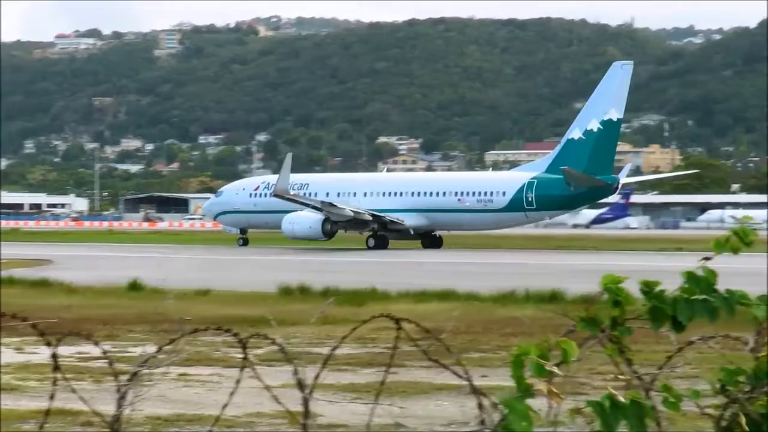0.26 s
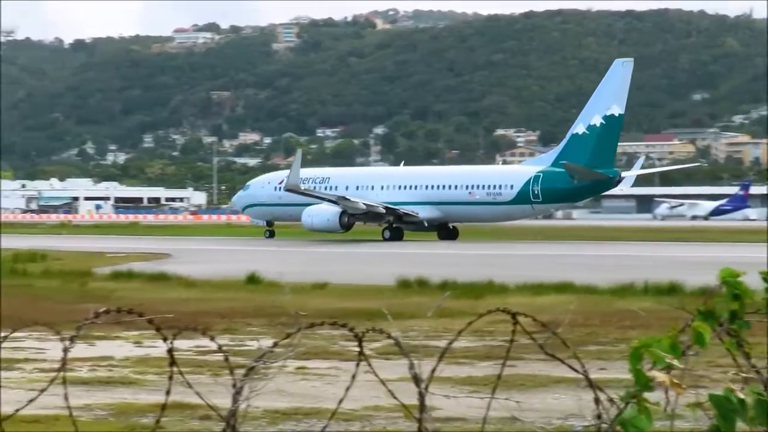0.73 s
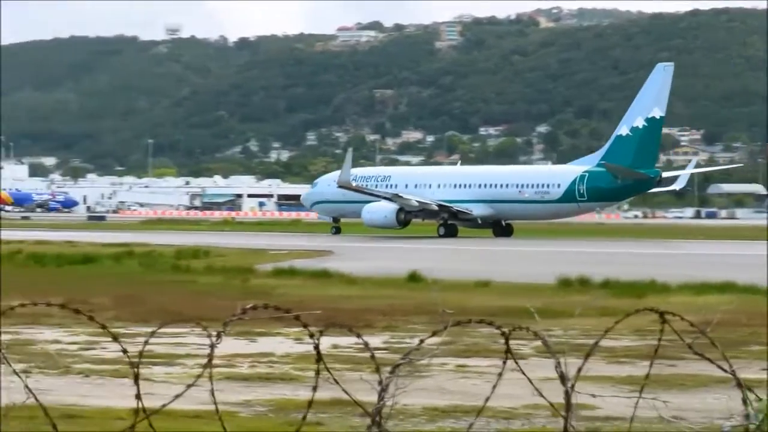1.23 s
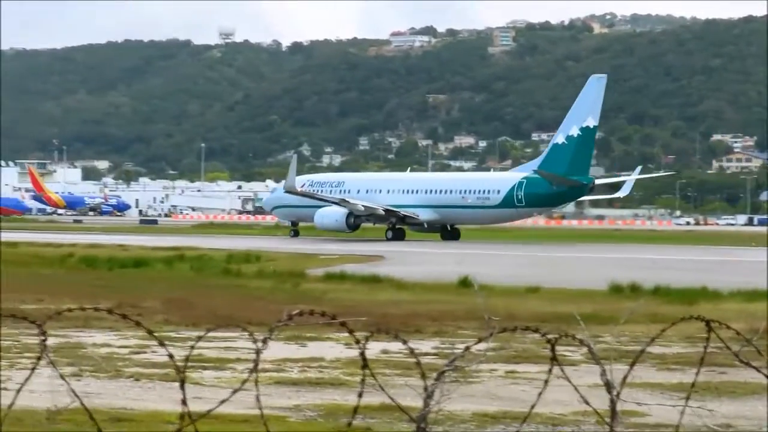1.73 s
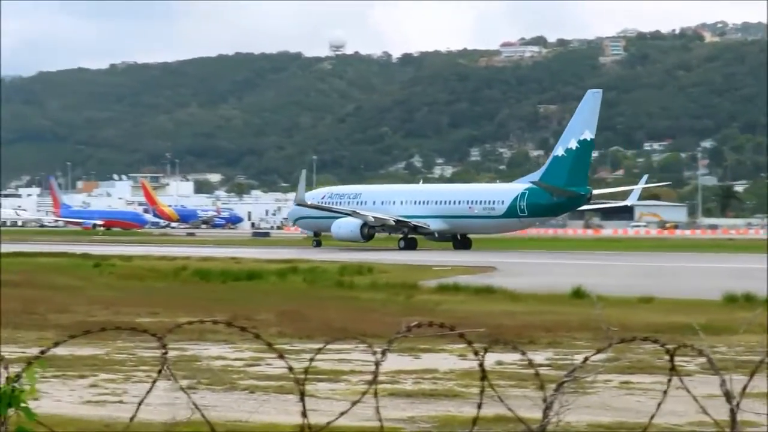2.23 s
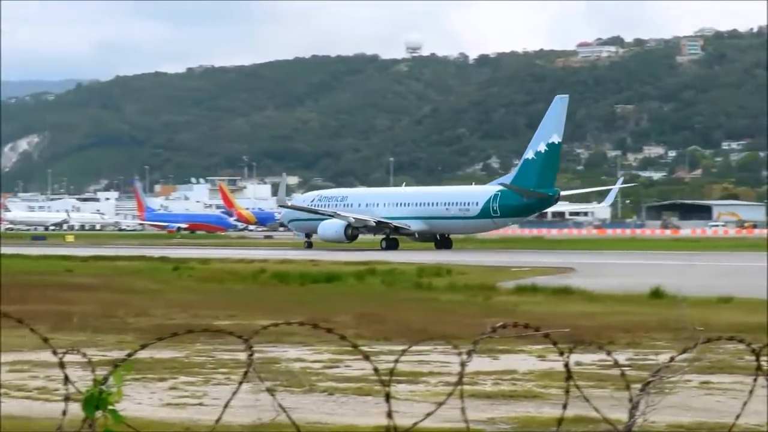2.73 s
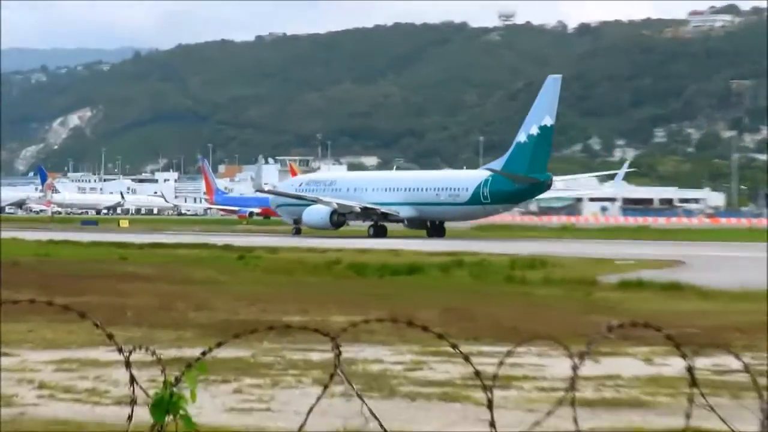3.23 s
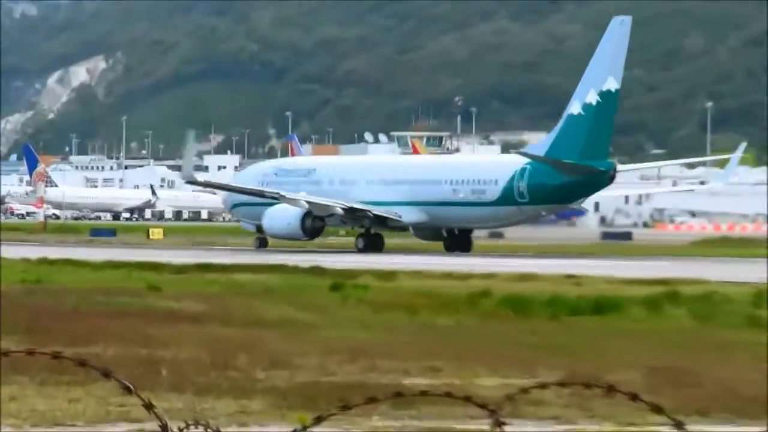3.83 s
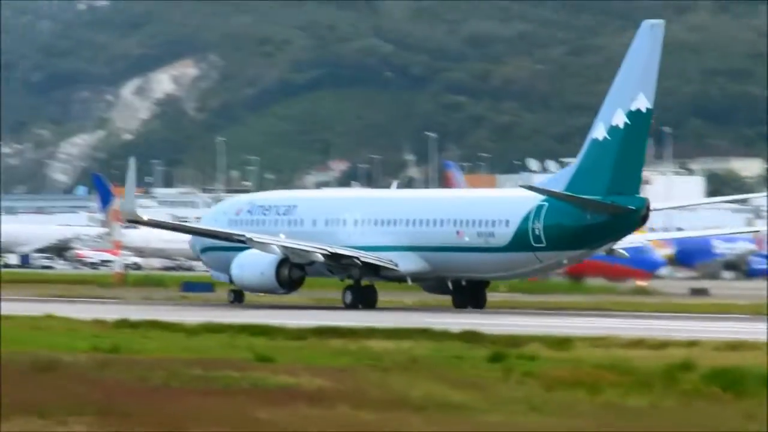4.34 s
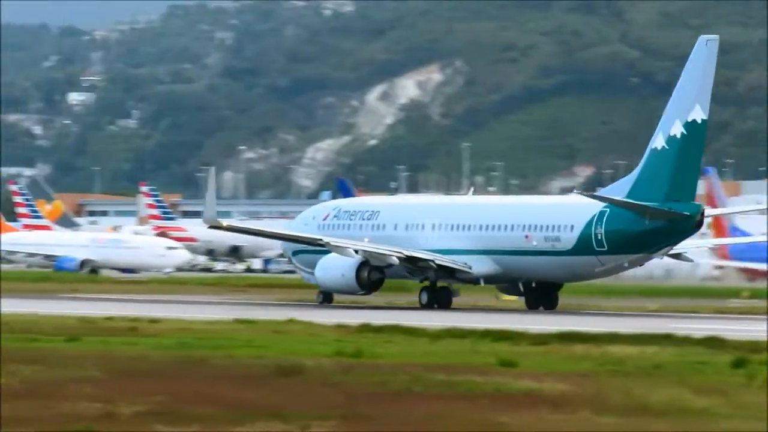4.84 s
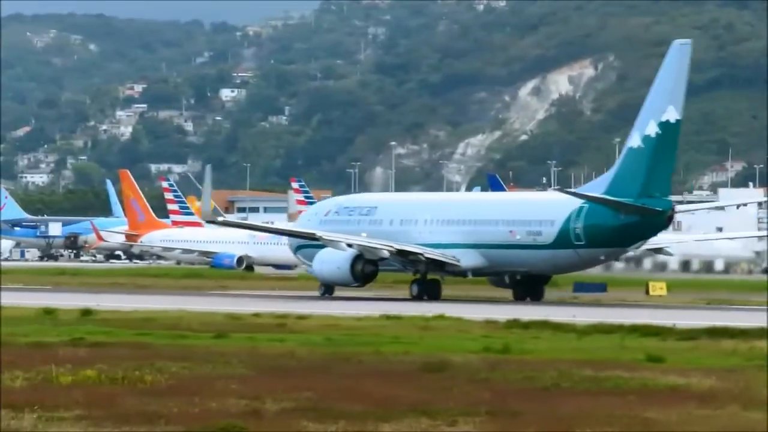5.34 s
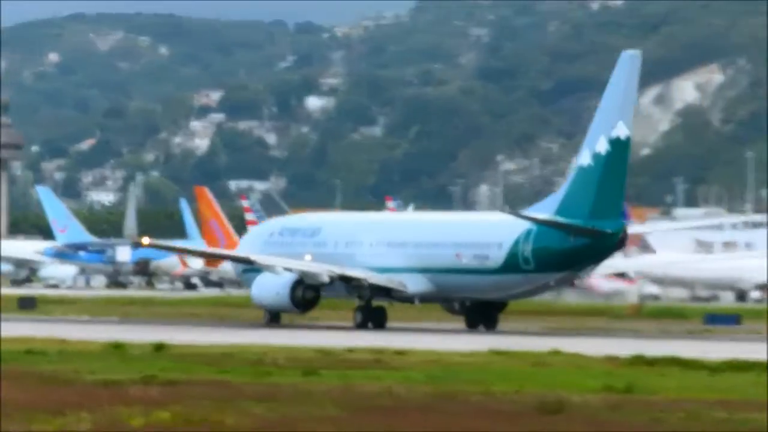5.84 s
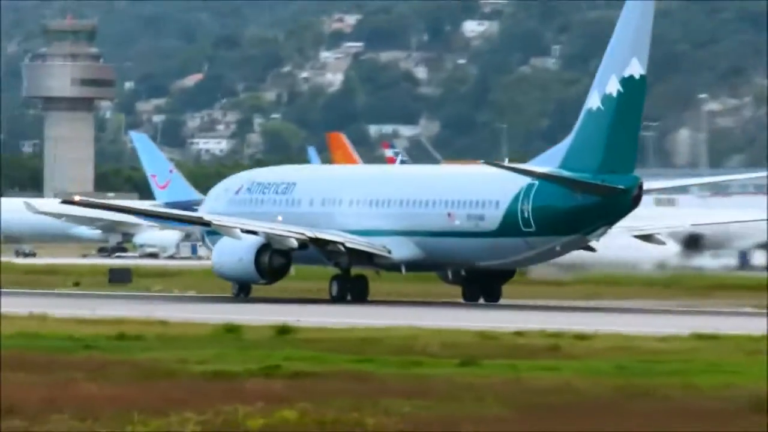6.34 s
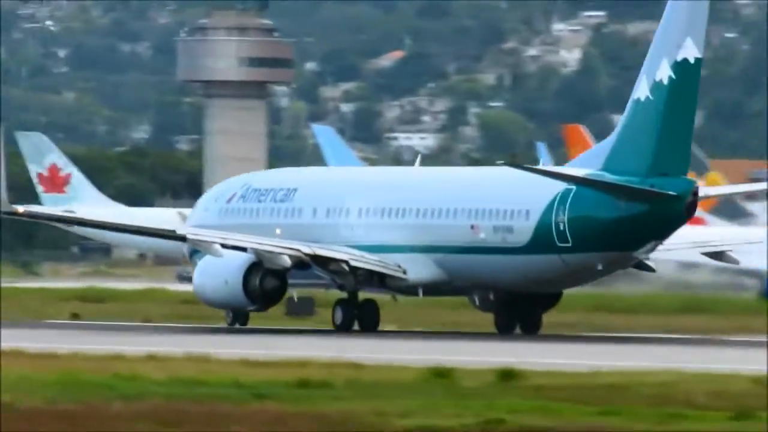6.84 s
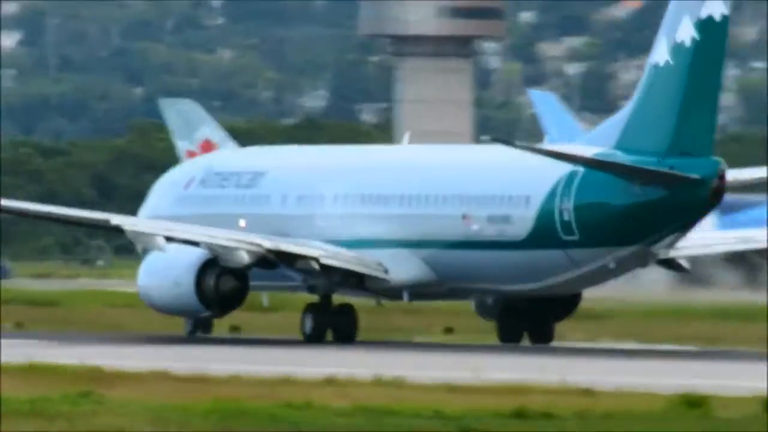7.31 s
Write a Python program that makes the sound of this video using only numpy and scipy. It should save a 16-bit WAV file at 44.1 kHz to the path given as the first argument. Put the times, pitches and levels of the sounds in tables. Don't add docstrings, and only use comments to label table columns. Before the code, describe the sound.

From the first instant a twin-engine jet at takeoff thrust fills an open airfield with wide, rough, hissing roar. A thin high fan whine rides on it, strongest around 0.6 seconds and flaring again near 1.7, 3.2 and 3.6, drifting slightly down. Wind buffets the small camera's stereo microphone; sharp ragged thumps cluster at 1.2-1.5 and 2.6-3.3 seconds, the level briefly ducking, most deeply near 2.85. The whine dies just after 4 seconds, and two tiny dry clicks come close together at 4.36. More gusts strike at 4.6 and 5.1-5.3. The roar sinks around 5.4, then swells back until 7, losing treble and gaining deep rumble as the tail turns toward the listener. Its texture flickers with the moving air. Lighter thumps fall around 6.5-6.8, then a last powerful gust hits at 7.5 and the sound cuts off.

```python
import sys
import numpy as np
from scipy import signal
from scipy.fft import rfft, irfft, next_fast_len
from scipy.io import wavfile
from scipy.ndimage import uniform_filter1d, minimum_filter1d, map_coordinates

SR = 44100
rng = np.random.default_rng(int(sys.argv[2]) if len(sys.argv) > 2 else 0)


def volts_from_db(level):
    exponent = np.asarray(level, float) / 20
    return 10 ** exponent


def transcribe(signal):
    frames = np.atleast_2d(signal).T
    limited = np.clip(frames, -1, 1)
    pcm = np.round(limited * 32767).astype(np.int16)
    wavfile.write(sys.argv[1], SR, pcm)


N = 333829

# time in seconds, loudness in dB, clarity of the air in dB.
JET_COURSE = [(0, 0.5, -0.5), (.5, -2, -3), (1.2, -0.5, -0.5), (1.45, -6, -0.5), (1.85, -1.5, -3),
              (2.35, -4, 4), (2.6, -1.5, 3.5), (2.75, -4.5, 0), (3.3, -3.5, 1), (3.9, -0.24, -1),
              (4.2, -2, -3.5), (4.6, -1, -8), (4.75, -6.5, -3), (5.4, -13.5, 0), (5.9, -9.5, 0.5),
              (6.4, -6, -0.5), (7.0, -0.5, -4.5), (7.57, -7, -2)]
JET_BANDS_HZ = [620, 1050, 1700, 3800]
# frequency in Hz, density in dB per Hz.
EXHAUST_SPECTRUM = [(15, -50), (30, -51), (55, -21.5), (90, -9), (200, -3), (450, 0), (900, 2.5),
                    (1700, -5), (3800, -14), (7300, -23), (12000, -45.5), (14300, -58), (14800, -63),
                    (15800, -110)]
# centre in Hz, half width in Hz, depth in dB.
HOUSING_NOTCHES = [(542, 18.4, 8), (895, 134, -3), (1155, 133, 8.5), (2023, 92, 5.5), (2687, 410, 11),
                   (2720, 90, 5.5), (5854, 770, 17.5), (5850, 120, 9.5), (9050, 740, 16)]
# frequency in Hz, density in dB per Hz.
PORT_DIFFERENCE = [(150, -66), (450, -44), (1250, -48), (1500, -28), (2300, -24), (3170, -47), (4300, -25),
                   (5550, -39), (6400, -33), (8900, -41), (10200, -37), (12300, -50), (13500, -48),
                   (15300, -75)]
# frequency in Hz, share from 0 to 1.
PORT_COHERENCE = [(1000, .3), (2200, 1), (4300, 0.99), (5700, .1), (7700, .6), (9100, .1), (10500, .7),
                  (12500, .1)]
# time in seconds, turn from 0 to 1, ground cancellation depth in dB.
TAIL_TURN = [
    (0, 0.07, 12),
    (.6, 0.15, 8.5),
    (1.8, 0.34, 9.5),
    (3, 0.52, 5),
    (4.2, 0.71, 24.5),
    (4.9, 0.74, 1),
    (5.85, 0.8, 20.5),
    (6.6, 1, 8),
    (7.15, 0.94, 19),
    (7.57, .99, -4),
]
# time in seconds, lift in dB, half length in seconds.
CLEAR_POCKETS = [(.16, 4, .09), (.66, 7.5, 0.14), (.98, 6.5, 0.11), (1.33, 6.5, 0.035), (1.53, 3, 0.087),
                 (1.72, 8, 0.095), (2.3, 2, .08), (2.56, 3, 0.062), (3.14, 2, .07), (3.55, 1.5, 0.067),
                 (3.79, 4.5, .09), (4.34, 4.5, 0.12), (4.52, 8, 0.088), (5.06, 2.5, .09), (5.79, 3, 0.03),
                 (6.07, 4.5, 0.12), (6.37, 2, .05), (6.75, 3.5, .06), (7.1, 2, .07), (7.41, 5.5, 0.081)]
# time in seconds, frequency in Hz.
BLADE_TONE = [(0, 3682), (.7, 3660), (1.7, 3634), (2.5, 3613), (3.2, 3597), (3.85, 3583), (7.6, 3520)]
# time in seconds, lift in dB, half length in seconds.
FAN_FLARES = [
    (.14, 12, .17),
    (.48, 10, .07),
    (.64, 22, .1),
    (1.1, 9, .2),
    (1.66, 18, .1),
    (1.9, 8, .15),
    (2.2, 9, .12),
    (3.15, 12, .12),
    (3.6, 14, .09),
    (3.8, 10, .1),
]
# peak time in seconds, peak in dB, half length in seconds, difference over common in dB.
GUST_PEAKS = [(0.31, -22.5, 0.034, -12), (0.763, -22, 0.11, -48), (1.01, -19, 0.13, -29),
              (1.276, -15, 0.082, -46), (1.367, -16.5, 0.082, -11), (1.466, -17, 0.13, -12),
              (1.733, -28, 0.029, -21), (1.95, -24.5, 0.16, -17), (2.36, -23.5, 0.14, -26),
              (2.638, -11.5, 0.048, -14), (2.846, -15.5, 0.13, -8), (3.087, -17.5, .1, -3),
              (3.29, -19, 0.084, -4), (3.65, -27, 0.27, -17), (4.063, -16, 0.063, -14),
              (4.27, -25.5, 0.15, -26), (4.466, -16.5, 0.091, -17), (4.6, -14, 0.084, -3),
              (4.88, -19.5, 0.24, -4.5), (5.07, -13, 0.16, -10), (5.165, -11, 0.038, -6),
              (5.255, -21.5, 0.088, -6), (5.646, -20, 0.073, -11.5), (6.15, -25.5, 0.069, -4),
              (6.29, -24, 0.064, -12), (6.48, -19.5, 0.094, -15), (6.795, -18, 0.13, -16),
              (7.05, -24.5, 0.21, -39), (7.31, -20, 0.17, -24), (7.492, -9.5, 0.064, -6.5)]
# frequency in Hz, density in dB per Hz.
COMMON_WIND = [(35, -46), (60, -38.5), (200, 1.5), (360, 1), (500, -1.5), (650, -7), (900, -16.5),
               (1600, -38), (3000, -39), (6600, -120)]
# frequency in Hz, density in dB per Hz.
DIFFERING_WIND = [(35, -74), (60, -45), (300, -3), (450, 1.5), (600, -6), (900, -8.5), (1500, -11.5),
                  (2300, -18), (3500, -29), (4600, -41), (7700, -120)]
# time in seconds, peak in dB, pitch in Hz, edge level in dB.
EDDY_THUMPS = [(1.233, -34, 905, -23), (1.287, -12.5, 412, -12), (1.338, 4, 635, -6.5),
               (1.349, -19.5, 624, -3), (1.43, -3, 412, -25), (1.465, -9, 339, -16), (2.6, -15, 374, -16),
               (2.748, -7, 635, -16), (2.787, -10, 560, -9), (2.842, -4, 535, -8), (2.881, -7, 613, -3),
               (2.906, -9.5, 426, -3), (2.997, -9.5, 845, -16), (3.01, -8, 417, -14),
               (3.271, -5.5, 400, -17), (4.598, -8, 433, -6), (4.617, -6, 508, -17), (5.152, -6.5, 650, -9),
               (5.172, 0.5, 328, -13.5), (5.264, -11, 496, -16), (5.298, -13, 372, -11),
               (5.445, -15, 390, -18), (5.473, -15.5, 854, -24), (5.67, -8.5, 394, -23),
               (5.689, -22, 333, -16), (6.501, -6, 317, -27), (6.648, -8, 440, -32), (6.83, -31, 790, -10),
               (7.46, 0, 360, -15), (7.538, -7, 383, -24)]
# frequency in Hz, density in dB per Hz.
TEARING_EDGE = [(200, -92), (450, -27), (800, 10), (1200, 10.5), (1700, -4), (2500, -18), (4000, -110)]
# time in seconds, level in dB.
BODY_TICKS = [
    (4.3592, -47),
    (4.3687, -48),
]
# time in seconds, depth in dB, recovery in seconds.
GAIN_DUCKS = [
    (1.372, 0, .04),
    (1.478, -0.5, 0.066),
    (2.67, 2, 0.039),
    (2.855, 9, 0.03),
    (4.63, 3, 0.084),
    (5.184, 0.5, 0.062),
    (5.31, -0.5, 0.14),
    (5.695, 0, .06),
    (7.472, 5.5, 0.045),
    (7.55, 1, .05),
]


def jet():
    hz, t, noise = signal.stft(rng.standard_normal((2, N)), SR, nperseg=2048, noverlap=1792)
    level_db = jet_level_db(hz, t)
    notches = [*HOUSING_NOTCHES, (13000, 500, 9)]
    notch_db = sum(depth_db / (1 + ((hz - centre_hz) / half_hz) ** 2) for centre_hz, half_hz, depth_db in notches)
    tied = np.clip(along(PORT_COHERENCE, hz), 0, 1)[:, None]
    other = np.sqrt(tied) * np.exp(-1.1j) * noise[0] + np.sqrt(1 - tied) * noise[1]
    port_sum = noise[0] * volts_from_db(along(EXHAUST_SPECTRUM, hz) - notch_db)[:, None]
    port_difference = other * volts_from_db(along(PORT_DIFFERENCE, hz) - 4.0)[:, None]
    shaped = [port_sum, port_difference] * volts_from_db(level_db)
    return volts_from_db(-2) * signal.istft(shaped, SR, nperseg=2048, noverlap=1792)[1][:, :N]


def jet_level_db(hz, t):
    turn, ground_db = curves(TAIL_TURN, t)

    def aspect(side_on, tail_on):
        return side_on + (tail_on - side_on) * turn

    ground_hz = aspect(338, 167)
    loss_db, tilt_db, deep_db = aspect(-1.15, 5.5), aspect(-1.9, 2.5), aspect(-19, 15)
    loud_db, clear_db = curves(JET_COURSE, t)
    clear_db = clear_db + swells(CLEAR_POCKETS, t)
    rumble_db = aspect(0, 0.5) + 3.5 + 0.52 * loud_db
    roar_db = loud_db + 0.04 * clear_db
    blast_db = loud_db + 1.73 + 0.46 * clear_db
    hiss_db = loud_db + clear_db
    levels = [rumble_db + deep_db, rumble_db, roar_db + tilt_db, roar_db - tilt_db,
              blast_db, hiss_db, hiss_db - loss_db, hiss_db - 2.06 * loss_db]
    knots_hz = [45, 170, *JET_BANDS_HZ, 7300, 13000]
    bands = np.arange(len(levels))
    place = np.interp(np.log(hz + 1), np.log(knots_hz), bands)
    level_db = np.clip(1 - abs(place[:, None] - bands), 0, 1) @ levels
    level_db -= ground_db / (1 + (np.log((hz[:, None] + 1) / ground_hz) / 0.17) ** 2)
    field = uniform_filter1d(rng.standard_normal((len(hz), len(t))), size=28, axis=0)
    field = uniform_filter1d(field, size=8, axis=1)
    return level_db + 1.3 * unit(field) + 0.069 * wobble(7.0, t) + 0.19 * wobble(21, t)


def whine(t):
    hz, = curves(BLADE_TONE, t)
    inlets_away_s = 4.1
    db = -50 - 1.5 * t - 25 * np.clip(t - inlets_away_s, 0, 1) + swells(FAN_FLARES, t)
    tone = 0
    for apart_hz, fan_db in [(0, 0), (14, -11)]:
        phase = 2 * np.pi * np.cumsum(hz + apart_hz + 7 * wobble(25, t)) / SR
        blade = np.sin(phase) + volts_from_db(-23) * np.sin(2 * phase)
        tone = tone + volts_from_db(db + fan_db + 1.5 * wobble(14, t)) * blade
    return 1.35 * tone * np.array([[1], [.05]])


def wind(t):
    shared = 1.44 * wobble(35, t)
    common = unit(volts_from_db(shared + 1.5 * wobble(70, t)) * coloured(COMMON_WIND))
    differ = unit(volts_from_db(shared + 7.9 * wobble(60, t)) * coloured(DIFFERING_WIND))
    pair = gusts(t) * [volts_from_db(-2.1) * common, volts_from_db(-5.0) * differ]
    add_thumps(pair)
    bass_cut_hz = 240
    return signal.sosfilt(signal.butter(2, bass_cut_hz, "high", fs=SR, output="sos"), pair)


def gusts(t):
    calm_db = np.array([-46, -61])
    power = volts_from_db(2 * calm_db)[:, None] * np.ones(len(t))
    for s, db, half_s, differ_db in GUST_PEAKS:
        width_s = half_s * np.where(t > s, 0.93, 1)
        peak = volts_from_db([[2 * db], [2 * (db + differ_db)]])
        power = power + peak * np.exp(-2 * ((t - s) / width_s) ** 2)
    return np.sqrt(power)


def add_thumps(pair):
    eddy_s, edge_s = 0.0079, 0.0068
    tearing = coloured(TEARING_EDGE)
    u = np.arange(SR // 10) / SR
    chances = rng.uniform(-0.61, 1, (len(EDDY_THUMPS), 2))
    for (s, db, hz, edge_db), (turn, skew) in zip(EDDY_THUMPS, chances):
        start = round(s * SR)
        swell = (u / eddy_s) * np.exp(1 - u / eddy_s * 3) * 3
        puff = swell * np.sin(2 * np.pi * hz * u * (1 - 6 * u) + np.pi * turn)
        edge_swell = (u / edge_s) * np.exp(1 - u / edge_s)
        edge = volts_from_db(edge_db) * 0.68 * edge_swell * np.roll(tearing, -start)[:len(u)]
        thump = puff * np.array([[1], [0.12 * skew]]) + edge * np.array([[1], [.45]])
        room = pair[:, start:][:, :len(u)]
        room += volts_from_db(db - 1.5) * thump[:, :room.shape[1]]


def ticks():
    x, u = np.zeros(N), np.arange(SR // 300) / SR
    for s, db in BODY_TICKS:
        x[round(s * SR):][:len(u)] += volts_from_db(db - 60 * u / .003) * np.sin(2 * np.pi * 14600 * u)
    return x * np.array([[1], [.4]])


def coloured(spectrum):
    m = next_fast_len(N)
    white = rfft(rng.standard_normal(m))
    return unit(irfft(white * volts_from_db(along(spectrum, np.fft.rfftfreq(m, 1 / SR))), m)[:N])


def wobble(rate, t):
    knots = rng.standard_normal(int(N * rate / SR) + 9)
    return map_coordinates(knots, [np.clip(t, 0, None) * rate])


def swells(rows, t):
    return sum(db * np.exp(-((t - s) / half_s) ** 2) for s, db, half_s in rows)


def curves(rows, t):
    s, *cols = np.transpose(rows)
    return np.array([np.interp(t, s, c) for c in cols])


def along(points, hz):
    f, v = np.transpose(points)
    return np.interp(np.log(hz + 1), np.log(f + 1), v)


def unit(x):
    return x / np.sqrt(np.mean(x ** 2) + 1e-20)


def scene():
    t = np.arange(N) / SR
    mid, side = jet() + whine(t) + wind(t) + ticks()
    return np.array([mid + side, mid - side])


def low_pass(x):
    return signal.sosfilt(signal.butter(12, 15760, fs=SR, output="sos"), x)


def record(dry):
    t = np.arange(N) / SR
    duck_db = sum(db * (t > s) * np.exp(-np.abs(t - s) / back_s) for s, db, back_s in GAIN_DUCKS)
    x = dry * volts_from_db(-uniform_filter1d(duck_db, size=200))
    ceiling = .8
    needed = np.minimum(1, ceiling / (np.abs(x).max(axis=0) + 1e-9))
    x = x * uniform_filter1d(minimum_filter1d(needed, size=500), size=400)
    x = x * np.clip((N - np.arange(N)) / 250, 0, 1)
    return low_pass(x)


dry = scene()
out = record(dry)
transcribe(out)
```